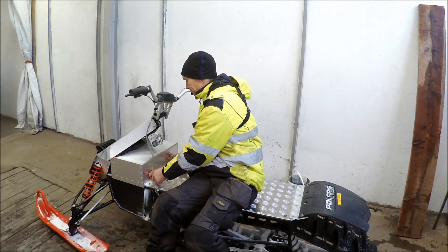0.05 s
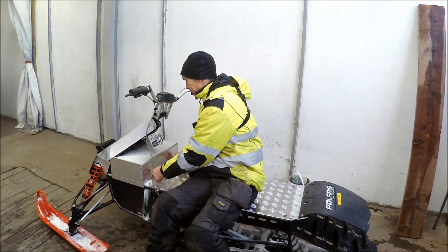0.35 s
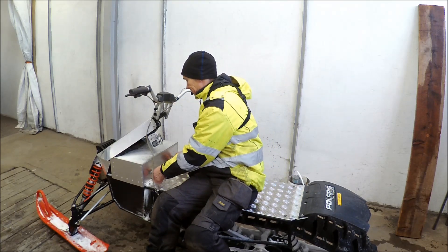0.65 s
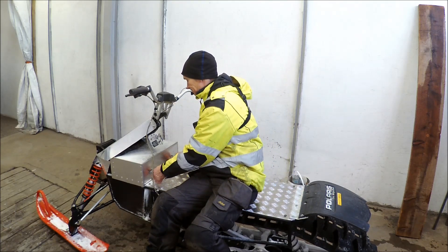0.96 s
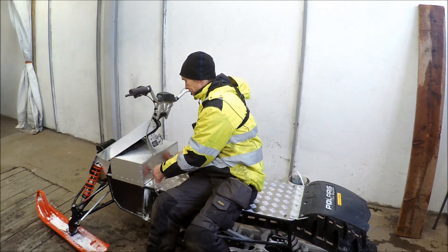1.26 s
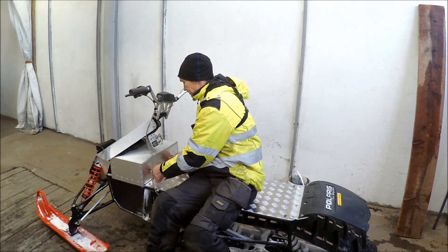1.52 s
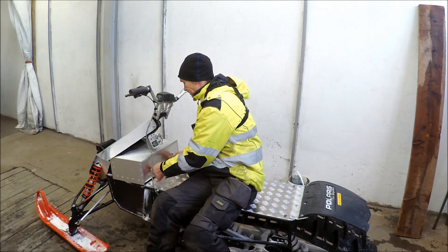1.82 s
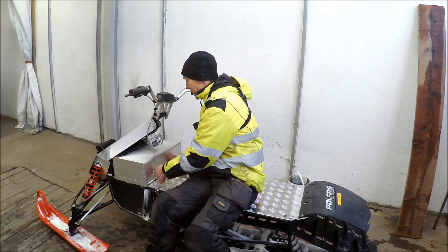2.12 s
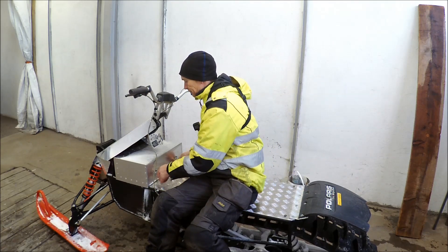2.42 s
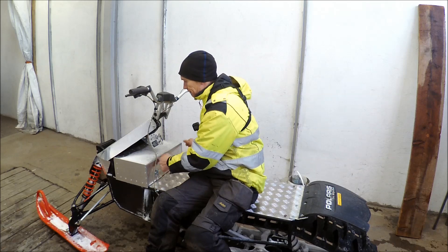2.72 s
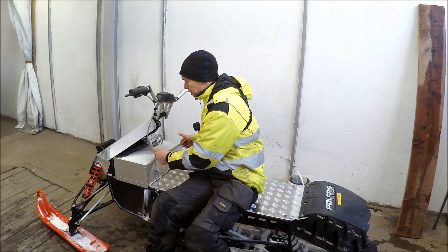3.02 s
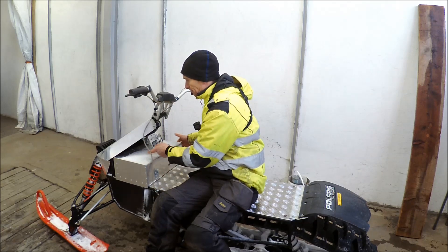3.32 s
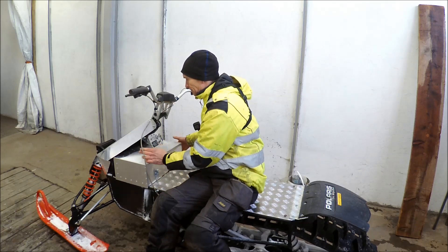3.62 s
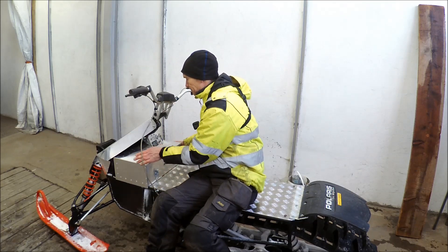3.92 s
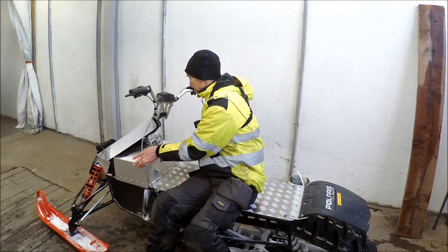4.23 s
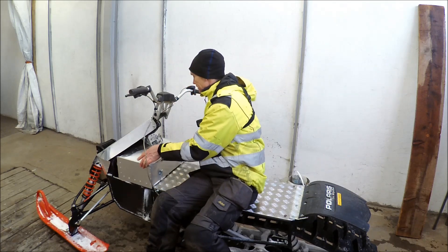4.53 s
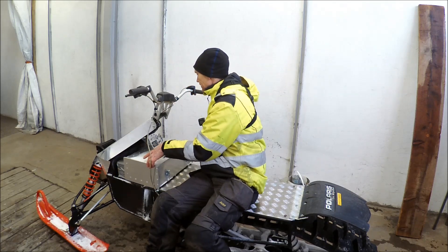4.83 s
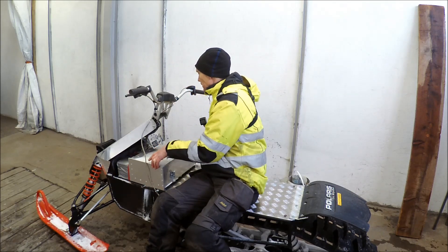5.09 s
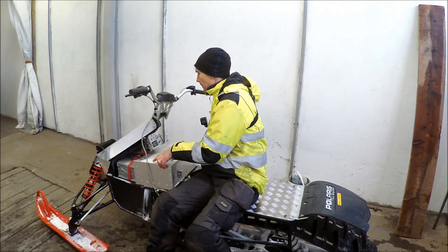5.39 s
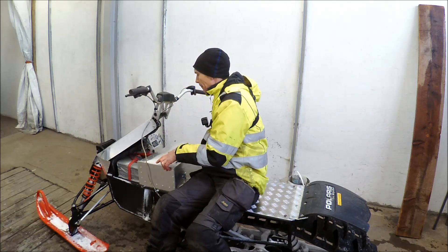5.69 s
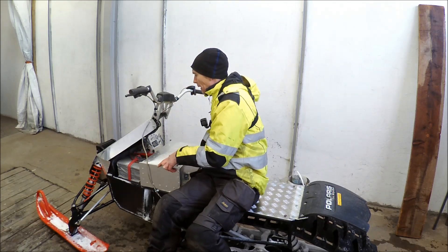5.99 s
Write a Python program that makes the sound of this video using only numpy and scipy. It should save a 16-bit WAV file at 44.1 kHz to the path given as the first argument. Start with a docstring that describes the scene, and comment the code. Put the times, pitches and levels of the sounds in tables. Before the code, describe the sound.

Latches snap open on a metal box, the lid clanks loose, then the box is dragged and bumped in an echoing shed.

```python
"""A sheet-aluminium box is opened and moved by hand in a bare, echoing shed.
First two latches snap open and ring. The box takes a few dull knocks, then the tight lid
squeaks and lets go with a double clank. Next a palm slides over the metal with a soft hiss.
Last, the box is dragged and bumped: its walls boom, its bottom sticks and slips in short groans,
and the lid clacks on the rim. A faint, low background noise runs underneath."""
import sys
import numpy as np
from scipy import signal
from scipy.fft import rfft, irfft
from scipy.io import wavfile
from scipy.ndimage import uniform_filter1d

SR = 44100
rng = np.random.default_rng(int(sys.argv[2]) if len(sys.argv) > 2 else 0)


def materialize(psi):
    """Save the field psi as 16-bit PCM at rate SR to the path in sys.argv[1].

    A 1-D psi becomes a single channel; in a 2-D psi each row is a channel.
    """
    bounded = np.clip(np.atleast_2d(psi).T, -1, 1)
    quanta = np.round(bounded * 32767).astype(np.int16)
    wavfile.write(sys.argv[1], SR, quanta)


N = 271215

# Each time the lid hits the rim: start_s, level_db, thump_db, chatter_s
LID_HITS = [(.133, -35, 18, .0046), (.195, -19.5, 7.5, 0.0013), (0.2486, -32.5, 15.5, 0.00068),
            (1.75, -34.5, 5, 0.0024), (2.205, -32.5, 23, .022), (2.323, -33.5, 20, 0.003),
            (2.424, -27, 19.5, 0.0023), (2.4657, -27.5, 20.5, .0026), (2.54, -27.5, 22, .004),
            (2.575, -21, 8, .012), (2.6277, 3.5, 4.5, 0.0073), (2.719, 0.5, 11, 0.0035),
            (4.398, -28.5, 12, .0049), (4.4357, -18, 10, 0.0015), (4.639, -18, 14, 0.023),
            (4.7325, -13, 5.5, 0.001), (4.877, -17.5, 17, 0.017), (5.278, -2.5, 5.5, 0.0028),
            (5.5074, -3.5, 5, 0.0012), (5.7779, -10.5, 8, 0.00069), (5.9238, -22.5, 13.5, 0.0058),
            (5.9771, -6, 6.5, 0.00038)]
# How strong the lid's tick is, from low to high: pitch_hz, level_db
LID_TICK = [(60, -17), (200, -8), (450, 1), (1000, 1), (2000, 1.5), (3000, 7.5), (4500, 0.5), (7000, -2),
            (9300, 1), (12000, -5.5), (16000, -15)]
# The notes the lid rings with (ring_s is the time to fade by 60 dB): pitch_hz, level_db, ring_s
LID_NOTES = [(478.5, 5.5, 0.78), (622, 3, 0.34), (752, 3.5, 0.86), (993, 3.5, 0.29), (1176, 2, 0.36),
             (1546, 4.5, 0.35), (1560, -15, 0.38), (2190, -6, .15), (2594, 5.5, 0.69), (2620, 10.5, 0.35),
             (2970, 7.5, 0.22), (3270, -14.5, .15), (5000, 5, 0.087), (7200, 2, 0.13), (8200, 9, 0.11),
             (8260, 11, .06), (9440, 7.5, .04)]

def lid(seated_hz=1037, loose_hz=886, loose_from_s=3.0):
    """The lid clanks on the rim. While seated it is stiffer, so it thumps at a higher pitch."""
    out = np.zeros((2, N))
    for start_s, level_db, thump_db, chatter_s in LID_HITS:
        thump_hz = seated_hz if start_s < loose_from_s else loose_hz
        clank = click(LID_TICK, LID_NOTES, thump_db, thump_hz, chatter_s,
                      echo_db=-4, chatter_db=19.5, ring_db=-3.5, edge_db=14.5)
        add(out, start_s, gain_of(level_db) * clank)
    return out


# Each click of a latch: start_s, level_db, thump_db, thump_hz, chatter_s, ring_db
LATCH_HITS = [(0.0296, -31.5, 13, 874, .003, -16), (0.3528, -11.5, 6, 2170, 0.0084, -4),
              (0.435, -26, 9, 1500, 0.0024, 2.5), (0.5782, -28.5, 1.5, 2500, 0.0008, -5),
              (.6635, -7.5, 2.5, 1000, 0.0042, -6)]
# How strong a latch's tick is, from low to high: pitch_hz, level_db
LATCH_TICK = [(60, -17), (250, 5.5), (750, 10), (1150, 10.5), (1500, 3.5), (2500, 5.5), (4200, -0.5),
              (7500, -0.5), (10000, -5.5), (13000, -3), (16000, -7.5)]
# The notes a latch rings with: pitch_hz, level_db, ring_s
LATCH_NOTES = [(748, 11.5, 0.54), (1066, 8, 0.54), (1150, -1, 0.59), (2180, -8, .45), (2060, 6, 0.51),
               (2510, -0.5, 0.9), (5400, -9, .2), (7000, -11, .25), (9880, 2, 0.38), (11800, -9, .2),
               (12420, -4, .25), (12400, 10, 0.23)]

def latches():
    """The two latches are fingered, snap open and dangle."""
    out = np.zeros((2, N))
    for start_s, level_db, thump_db, thump_hz, chatter_s, ring_db in LATCH_HITS:
        snap = click(LATCH_TICK, LATCH_NOTES, thump_db, thump_hz, chatter_s,
                     echo_db=-6.5, chatter_db=4, ring_db=ring_db, edge_db=14)
        add(out, start_s, gain_of(level_db) * snap)
    return out


def click(tone, notes, thump_db, thump_hz, chatter_s, echo_db, chatter_db, ring_db, edge_db,
          thump_octaves=0.89, edge_hz=11500, edge_loss=0.8):
    """Metal on metal: a hard tick sets the part ringing. Flatter hits thump more and sound less sharp."""
    hz = bins() + 1
    weak_lows_db = -5 / (1 + (hz / 1900) ** 4)  # treble leaves at once; lower notes build up
    tick = unit(pulse(read(tone, hz)))
    chatter = colour(contact(chatter_s, chatter_db), weak_lows_db)
    crack = shed(tick, echo_db, chatter)[:, :SR]
    panel_db = thump_db * np.exp(-.5 * (np.log2(hz / thump_hz) / thump_octaves) ** 2)
    treble_db = (edge_db - edge_loss * thump_db) / (1 + (edge_hz / hz) ** 10)
    return colour(crack + gain_of(ring_db) * ring(notes), panel_db + treble_db)


# Each dull blow on the box: start_s, level_db, brightness_hz, wall_note_hz, chatter_s
BOX_BLOWS = [(.358, -12.5, 300, 213, 0.022), (.666, -11, 258, 208, 0.043), (1.712, -12.5, 890, 357, .02),
             (1.737, 1.5, 121, 103, 0.013), (1.744, -4.5, 770, 362, 0.007), (1.752, -5, 770, 627, 0.021),
             (2.138, -9, 71.2, 105, 0.012), (2.629, -15, 300, 210, 0.012), (2.719, -5.5, 450, 212, .007),
             (3.252, -16, 251, 108, 0.0055), (4.877, -4.5, 450, 345, 0.0096), (4.996, 1, 607, 295, .009),
             (5.041, -4.5, 450, 217, 0.0075), (5.3406, 8, 748, 216, 0.0089), (5.353, 6, 755, 278, 0.023),
             (5.384, 5, 400, 144, 0.023), (5.55, 0.5, 450, 156, 0.023), (5.84, -10.5, 550, 159, .02),
             (6.0133, 1.5, 545, 156, .007), (6.058, -6.5, 400, 108, 0.014)]
# How strong a thud is, from low to high: pitch_hz, level_db
BOX_THUD = [(25, -22.5), (70, -9.5), (110, 2), (165, -9.5), (220, -7.5), (330, 2.5), (430, -9.5), (700, -6),
            (1500, -9), (4000, -5.5), (16000, -30)]
# The notes the box walls ring with: pitch_hz, level_db, ring_s
BOX_NOTES = [(109.3, -1, .75), (158.5, -8, 0.68), (212.3, -4, .55), (296.8, -6.5, 0.83), (334.6, 0.5, 0.17),
             (352, 4, 0.36), (488, -3.5, 0.44), (568, -24, 0.16), (624.4, -3, 0.14), (707, -9, 0.61),
             (770, -10.5, 0.84), (985, -9, 0.51)]

def knocks(echo_db=-5, chatter_db=9, boom_db=-2, boost_db=1, note_db=7, note_octaves=0.15):
    """Soft, heavy blows thud and make the walls boom, most of all at the note of the spot they hit."""
    out, hz = np.zeros((2, N)), bins() + 1
    thud = unit(pulse(read(BOX_THUD, hz)))
    for start_s, level_db, brightness_hz, wall_note_hz, chatter_s in BOX_BLOWS:
        blow = shed(thud, echo_db, contact(chatter_s, chatter_db))[:, :SR]
        blow += gain_of(boom_db) * ring(BOX_NOTES)
        cushion_db = -10 * np.log10(1 + (hz / brightness_hz) ** 3)
        # Well below that note, the wall moves little air.
        bass_cut_db = -10 * np.log10(1 + (0.59 * wall_note_hz / (hz + 10)) ** 4)
        peak_db = note_db * np.exp(-.5 * (np.log2(hz / wall_note_hz) / note_octaves) ** 2)
        blow = colour(blow, cushion_db + bass_cut_db + peak_db)
        add(out, start_s, gain_of(boost_db + level_db) * np.sqrt(2) * unit(blow))
    return out


def ring(notes, uneven_db=-0.5, detune_share=0.0031, swell_s=0.00067):
    """Struck metal rings with fading notes. Where it is hit and held changes them a little each time."""
    t = np.arange(SR) / SR
    hz, db, ring_s = np.transpose(notes)[:, :, None]
    weight, detune, start, apart = rng.standard_normal((4, len(notes), 1))
    phase = np.float32(2 * np.pi * (hz * (1 + detune_share * detune) * t + start))
    fade = np.exp(np.float32(-np.log(1000) / ring_s * np.minimum(t, 2 * ring_s)))
    level = np.float32(gain_of(db + uneven_db * weight)) * fade
    # Each note reaches left and right a little out of step.
    sides = np.array([(level * np.sin(phase + np.float32(side * apart / 2))).sum(0) for side in (-1, 1)])
    return unit(sides * (1 - np.exp(-t / swell_s))) * np.sqrt(2)


def contact(chatter_s, chatter_db, alike=0.64):
    """A hit breaks up into a quickly fading chatter, which the panels scatter left and right."""
    t = np.arange(SR // 8) / SR
    fade = np.exp(-t / max(chatter_s, 1 / SR))
    force = gain_of(chatter_db) * unit(stereo_noise(len(t), alike) * fade)
    force[:, 0] = np.sqrt(.5)  # the first touch
    return unit(force) * np.sqrt(2)


# Each squeak as the tight lid is prised up: start_s, pitch_hz, level_db
LID_SQUEAKS = [(2.424, 10300, -34.5), (2.4657, 10000, -32.5), (2.5226, 9250, -29.5), (2.5715, 9000, -26),
               (2.58, 12900, -18.5), (2.592, 9100, -30.5)]

def squeaks(width_hz=750, decay_s=0.0039, echo_db=-7):
    """Each slip of the lid edge is a brief scrape that rings around one high pitch."""
    out, t = np.zeros((2, N)), np.arange(SR // 10) / SR
    for start_s, pitch_hz, level_db in LID_SQUEAKS:
        resonance = pulse(-20 * np.log10(1 + ((bins() - pitch_hz) / width_hz) ** 2))
        scrape = rng.standard_normal(len(t)) * np.exp(-t / decay_s)
        squeak = unit(signal.oaconvolve(scrape, resonance))
        add(out, start_s, gain_of(level_db) * shed(squeak, echo_db))
    return out


# Each groan of the pushed box: start_s, length_s, slips_per_s, level_db
BOX_GROANS = [(4.98, 0.094, 400, -49), (5.116, 0.11, 323, -40), (5.47, 0.11, 297, -39),
              (5.674, 0.091, 280, -47), (6.001, .07, 298, -33.5), (6.091, 0.076, 274, -37)]

def judder(sag_hz_per_s=202, fade_db=-5, waver_share=0.029, overtone_db=-14, uneven_db=2, echo_db=-8):
    """The box bottom sticks and slips fast enough to groan, slowing and weakening as a push runs out."""
    out = np.zeros((1, N))
    for start_s, length_s, slips_per_s, level_db in BOX_GROANS:
        level = push(length_s, level_db, fade_db)
        t = np.arange(len(level)) / SR
        waver, grip = wobble(len(t)), wobble(len(t))
        pitch_hz = (slips_per_s - sag_hz_per_s * t) * (1 + waver_share * waver)
        cycles = np.cumsum(pitch_hz) / SR
        groan = sum(gain_of(overtone_db * k) * np.sin(2 * np.pi * (k + 1) * cycles) for k in range(3))
        add(out, start_s, (groan * level * gain_of(uneven_db * grip))[None])
    return shed(out[0], echo_db)[:, :N]


# Each stroke of palm or sleeve: start_s, length_s, level_db, swell_db
PALM_STROKES = [(0, 0.065, -55.5, -27), (.46, 0.27, -67, 15), (1.11, .05, -66, -13), (1.26, 0.16, -77, -8),
                (1.63, 0.17, -66.5, 8), (1.98, 0.23, -59, -1), (2.18, 0.098, -53, -7),
                (2.28, 0.32, -52.5, 8), (3.16, 0.098, -56.5, 2.5), (3.3, 0.37, -73, -1.5),
                (3.83, .38, -57, -5.5), (4.3, .17, -55.5, 16.5), (4.48, .4, -54.5, 13),
                (4.87, 0.13, -39, 7), (5.24, 0.22, -45, -10), (5.87, .26, -47.5, -13)]
# How strong the hiss is, from low to high: pitch_hz, level_db
PALM_HISS = [(50, -34), (300, -4.5), (750, 1), (1700, 1), (3000, -3.5), (5000, -9.5), (9000, -16),
             (16000, -8.5)]

def palm(level_db=-5):
    """Palm and sleeve slide over the lid; their tiny slips blur into a hiss."""
    tone = pulse(read(PALM_HISS, bins()))
    hiss = friction(PALM_STROKES, tone, slips_per_s=11000, spread_db=2, rest_db=-76.5)
    return gain_of(level_db) * shed(hiss, echo_db=-0.5)[:, :N]


# Each shove of the box: start_s, length_s, level_db, swell_db
BOX_SHOVES = [(0, 1.3, -61.5, -9), (1.8, 0.33, -49.5, -5), (2.25, 0.64, -50, 6.5), (4.3, 0.49, -56, 8),
              (4.86, 0.38, -48.5, -7), (5.59, 0.17, -47, -8), (5.98, 0.16, -44, -8)]

def drag(level_db=-3):
    """Dragging the box keeps its walls ringing in a low drone."""
    drone = friction(BOX_SHOVES, ring(BOX_NOTES)[0], slips_per_s=500, spread_db=0, rest_db=-66.5)
    return gain_of(level_db) * shed(drone, echo_db=-14.5)[:, :N]


def friction(moves, slip_sound, slips_per_s, spread_db, rest_db):
    """Countless tiny, uneven slips shake the metal, as strongly as each movement presses."""
    slips = rng.standard_normal(N) * (rng.random(N) < slips_per_s / SR)
    slips *= gain_of(spread_db * np.minimum(rng.exponential(1, N), 4))
    level = np.zeros((1, N))
    for start_s, length_s, level_db, swell_db in moves:
        add(level, start_s, push(length_s, level_db, swell_db)[None])
    level = np.hypot(level[0], gain_of(rest_db))  # the hand is never quite still
    return signal.oaconvolve(unit(slips) * np.sqrt(N) * level, unit(slip_sound))[:N]


def push(length_s, level_db, swell_db, start_up_s=0.025, stop_s=0.025):
    """The loudness of one hand movement: it eases in, changes by swell_db, then dies away."""
    t = np.arange(round((length_s + 10 * stop_s) * SR)) / SR
    rise_s = start_up_s + 0.13 * length_s  # long movements start more gently
    rise = np.sin(np.pi / 2 * np.minimum(t / rise_s, 1)) ** 2
    fall = np.exp(-np.maximum(t - length_s, 0) / stop_s)
    return rise * fall * gain_of(level_db + swell_db * (np.minimum(t / length_s, 1) - .5))


# How long the shed's echo takes to fade by 60 dB: pitch_hz, ring_s
ECHO_TIMES = [(100, 2.17), (400, 1.13), (1000, 1.27), (2700, 0.85), (4000, 0.71), (7500, 0.53),
              (11000, 0.39), (16000, 0.47)]
# How strong the echo is, from low to high: pitch_hz, level_db
ECHO_LEVELS = [(100, 9), (500, 9.5), (1200, 6), (3000, 6.5), (6000, 10.5), (8000, 3.5), (10000, -1.5),
               (16000, 5.5)]

def shed(sound, echo_db, direct=np.ones((2, 1)), early_db=3, early_s=0.0733, build_s=0.00033):
    """Sound arrives directly, then off the box and floor, then as an echo that loses its treble first."""
    hz, t, noise = signal.stft(stereo_noise(SR, alike=0.36), SR, nperseg=256)
    ring_s = read(ECHO_TIMES, hz)[:, None]
    fade = np.exp(-np.log(1000) * t / ring_s) * np.sqrt(2 * np.log(1000) / (ring_s * SR))
    level = gain_of(read(ECHO_LEVELS, hz)[:, None] + echo_db)
    room = signal.istft(noise * fade * level, SR, nperseg=256)[1]
    t = np.arange(room.shape[1]) / SR
    room *= (1 - np.exp(-t / build_s)) * gain_of(early_db * np.exp(-t / early_s))
    room[:, :direct.shape[1]] += direct * gain_of([[0.45], [-0.45]])  # a little louder on the left
    return signal.oaconvolve(sound[None], room, axes=1)


# How strong the background noise is, from low to high: pitch_hz, level_db
AIR_TONE = [(12, -48.5), (20, -1), (113, -17.5), (138, -10.5), (198, -9.5), (270, -16.5), (337, -13.5),
            (434, -20), (472, -18), (718, -24.5), (1660, -35), (1960, -33), (2530, -47), (10500, -46),
            (16000, -53.5)]

def air(level_db=-57.5):
    """The low, steady background of the shed."""
    tone = gain_of(read(AIR_TONE, bins(N)))
    noise = irfft(rfft(stereo_noise(N, alike=0.28)) * tone, N)
    return gain_of(level_db) * unit(noise) * np.sqrt(2 * N)


def gain_of(db):
    """Turns decibels into a number to multiply by."""
    return 10 ** (np.asarray(db) / 20)


def unit(sound):
    """Scales a sound to an energy of one."""
    return sound / np.sqrt(np.sum(sound ** 2) + 1e-20)


def read(table, hz):
    """Looks up pitches in a table, sliding smoothly between its rows."""
    pitch_hz, value = np.transpose(table)
    return np.interp(np.log(hz + 1), np.log(pitch_hz + 1), value)


def add(mix, start_s, sound):
    """Adds a sound to the mix at start_s."""
    part = mix[:, max(round(start_s * SR), 0):]
    part[:, :sound.shape[1]] += sound[:, :part.shape[1]]


def bins(size=4096):
    """Evenly spaced pitches, in Hz, on which a tone is drawn."""
    return np.fft.rfftfreq(size, 1 / SR)


def pulse(db):
    """The sharpest pulse that has these levels from low to high pitch."""
    log_gain = np.log(gain_of(np.concatenate([db, db[-2:0:-1]])))
    return np.fft.ifft(np.exp(np.conj(signal.hilbert(log_gain)))).real


def colour(sound, db):
    """Turns each pitch of a stereo sound up or down by db."""
    return signal.oaconvolve(sound, pulse(db)[None], axes=1)


def stereo_noise(count, alike):
    """Left and right noise that are partly the same."""
    left, other = rng.standard_normal((2, count))
    return np.array([left, alike * left + np.sqrt(1 - alike ** 2) * other])


def wobble(count):
    """Smoothed noise that wanders around zero."""
    return unit(uniform_filter1d(rng.standard_normal(SR), size=500))[:count] * np.sqrt(SR)


# How the microphone lifts or lowers each pitch: pitch_hz, gain_db
MIC_TONE = [(3500, -2), (6000, -5.5), (7500, 3.5), (9200, 7.5), (10500, 5), (12000, -3.5), (16000, -14.5)]

def scene():
    """The box, heard through a small microphone with a treble peak, over the shed's background."""
    box = latches() + lid() + squeaks() + knocks() + palm() + drag() + judder()
    return colour(box, read(MIC_TONE, bins()))[:, :N] + air()


def record(dry, top_hz=16000):
    """Rounds off the sharpest peaks, then removes the treble above top_hz."""
    low_pass = signal.firwin(255, top_hz, window=("kaiser", 9), fs=SR)
    return signal.oaconvolve(np.tanh(dry), low_pass[None], "same")


dry = scene()
out = record(dry)
materialize(out)
```